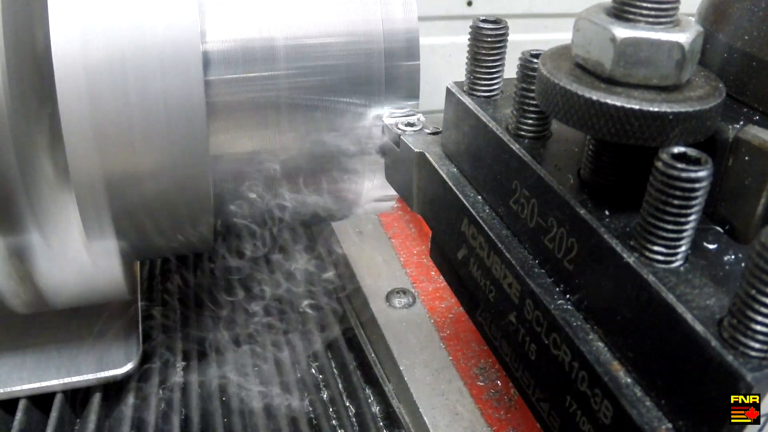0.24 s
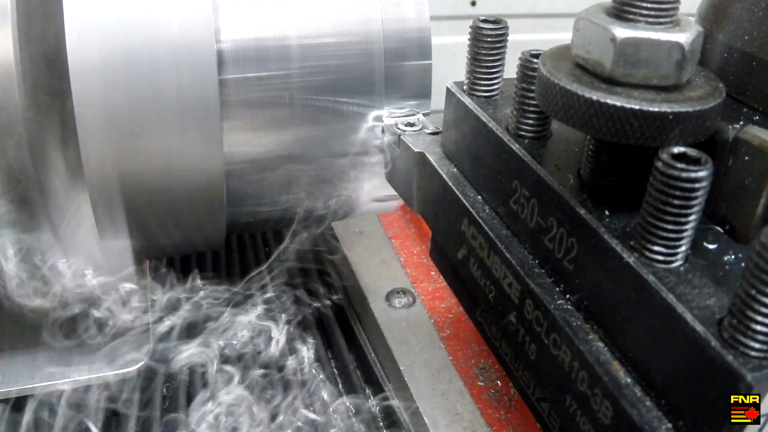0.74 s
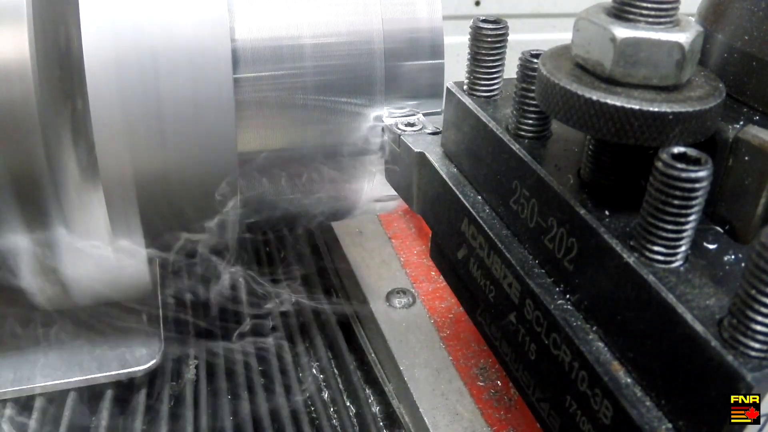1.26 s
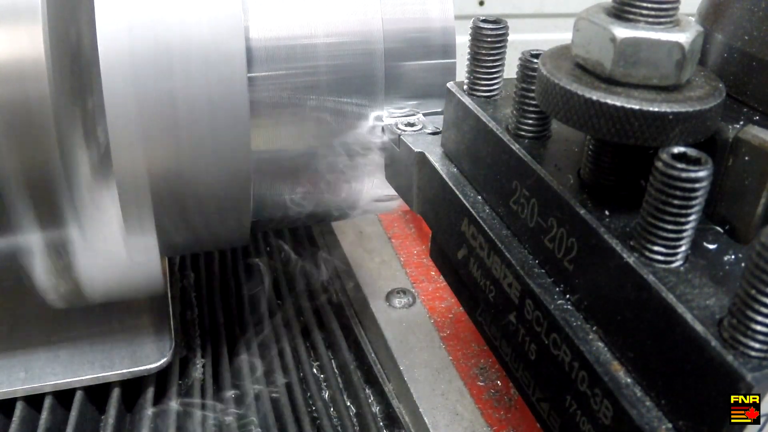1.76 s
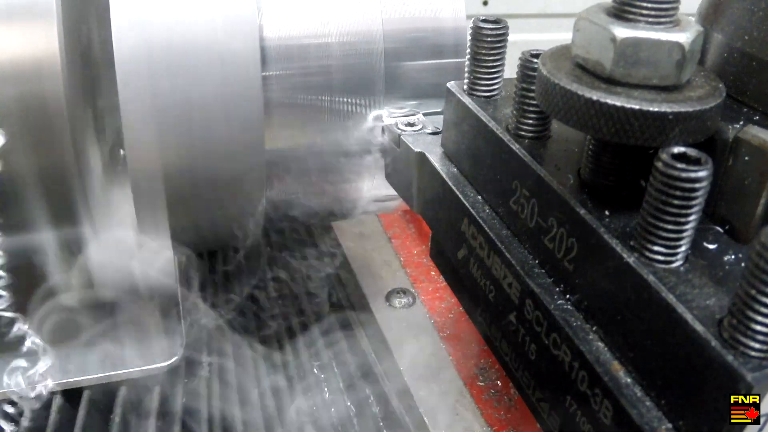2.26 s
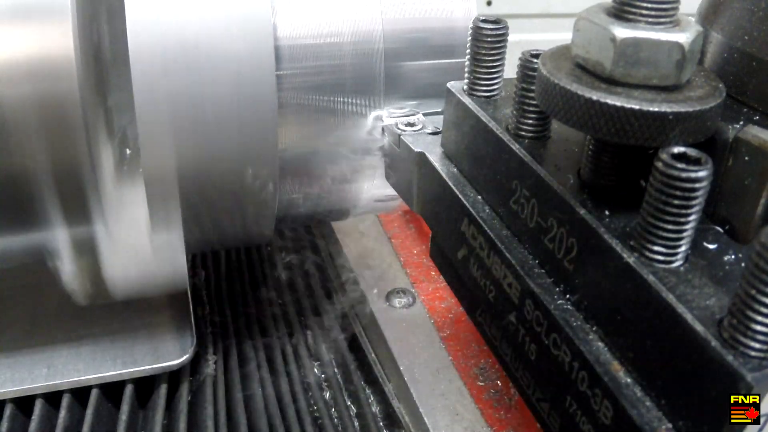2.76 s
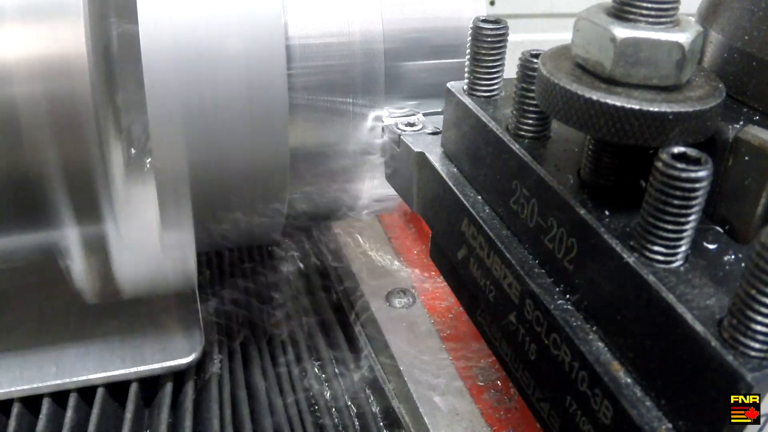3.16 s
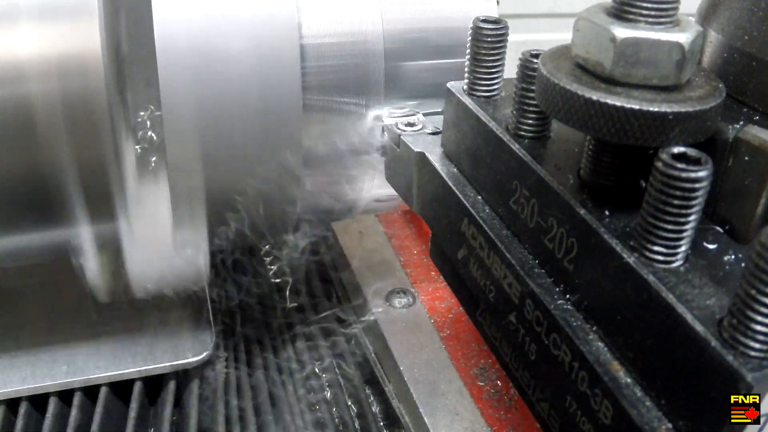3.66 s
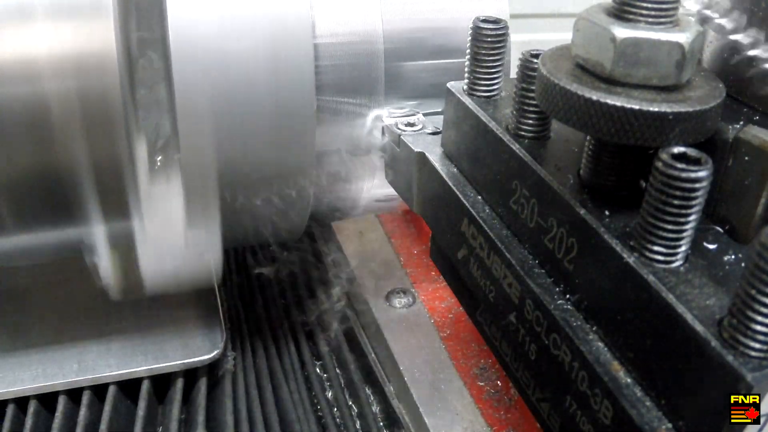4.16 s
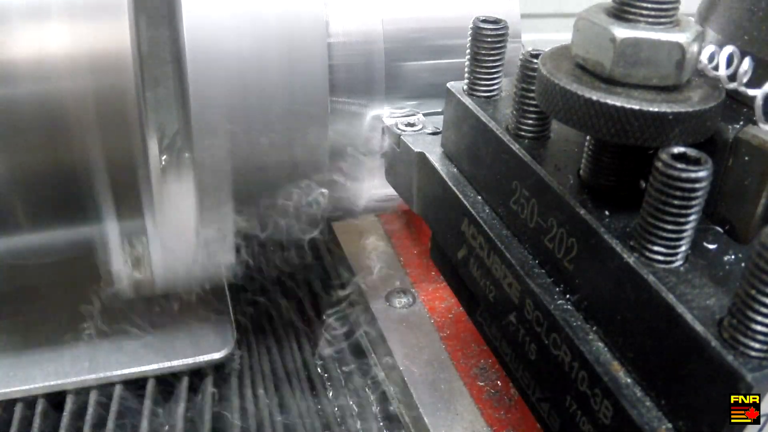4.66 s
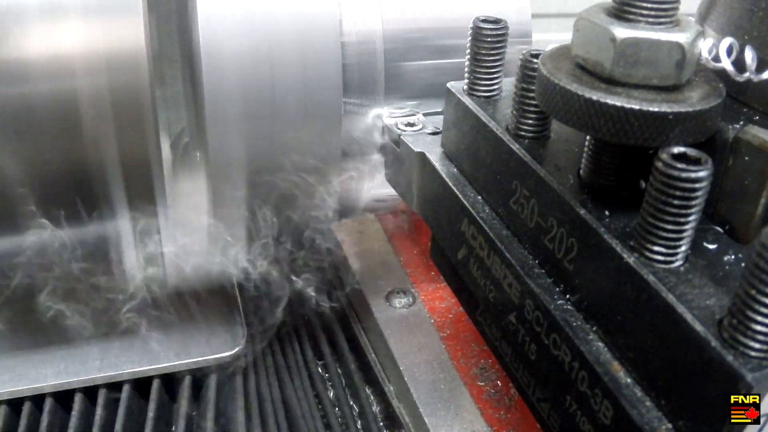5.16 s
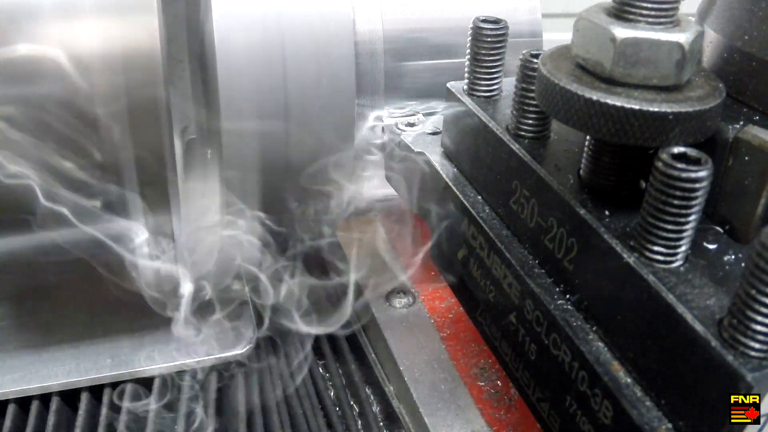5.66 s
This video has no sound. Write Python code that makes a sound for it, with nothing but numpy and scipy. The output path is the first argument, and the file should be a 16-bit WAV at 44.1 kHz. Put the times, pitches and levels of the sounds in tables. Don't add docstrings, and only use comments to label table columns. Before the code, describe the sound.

A lathe drones and hums while its tool scrapes and hisses on spinning metal, with curled chips snapping sharply against the housing.

```python
import sys
import numpy as np
from scipy import signal
from scipy.fft import rfft, irfft
from scipy.io import wavfile
from scipy.ndimage import uniform_filter1d

SR = 44100
rng = np.random.default_rng(int(sys.argv[2]) if len(sys.argv) > 2 else 0)


def gain_from_decibels(decibels):
    exponent = np.asarray(decibels, float) / 20
    return 10 ** exponent


def persist_wave(psi):
    counts = np.round(np.clip(psi, -1, 1) * 32767).astype(np.int16)
    wavfile.write(sys.argv[1], SR, np.atleast_2d(counts).T)


N = 261072


def evened(x):
    return x / np.sqrt(np.mean(x ** 2) + 1e-20)


def add(mix, s, sound):
    part = mix[round(s * SR):][:len(sound)]
    part += sound[:len(part)]


def drift(hz):
    f = np.fft.rfftfreq(N, 1 / SR)
    return evened(irfft(rfft(rng.standard_normal(N)) / np.sqrt(1 + (f / hz) ** 4), N))


def band(x, lo_hz, hi_hz):
    sos = signal.butter(4, [lo_hz, hi_hz], "band", fs=SR, output="sos")
    return evened(signal.sosfilt(sos, x))


def shaken(force, modes, skirt):
    f = np.fft.rfftfreq(N, 1 / SR)
    power = 0
    for hz, width, db in modes:
        power = power + gain_from_decibels(db) ** 2 / (1 + (2 * (f - hz) / width) ** 2) ** skirt
    return evened(irfft(rfft(force) * np.sqrt(power), N))


# (t/s, level over rest/dB, fade/s)
BITES = [(0.024, 5.5, 0.057), (0.132, 8, 0.051), (0.231, 3.5, 0.081), (0.355, 8, 0.091), (0.6, 6.5, 0.051),
         (0.728, 6, .1), (0.839, 7, 0.058), (0.962, 6.5, 0.059), (1.108, 4.5, 0.11), (1.245, 2.5, 0.095),
         (1.33, 1.5, 0.097), (1.71, 4.5, .07), (1.839, 5.5, 0.15), (2.108, 9, 0.07), (2.292, 5, 0.12),
         (2.466, 5.5, 0.091), (2.6, 9, 0.022), (2.713, 0, 0.12), (2.925, 6, 0.018), (3.067, 4, 0.12),
         (3.2, 2, .2), (3.467, 5.5, 0.12), (3.69, 5, 0.32), (4.113, 2, 0.84), (4.513, 1, 0.05),
         (4.802, 2.5, 0.21), (5.162, 4, 0.077), (5.292, 4, 0.074), (5.41, 3.5, 0.17), (5.741, 6, 0.094)]


def bite_db(t):
    rest_db, catch_s = -10, 0.0013
    force_db = rest_db
    for s, db, fade in BITES:
        since = np.maximum(t - s, 0)
        force_db = force_db + db * (1 - np.exp(-since / catch_s)) * np.exp(-(since / fade) ** 2)
    return force_db


def cutting_force(turn_db, gust_db, grit_db):
    spindle_hz = 8.8
    turns = np.cumsum(spindle_hz * (1 + 0.045 * drift(2.0))) / SR
    swell_db = turn_db * np.cos(2 * np.pi * turns)
    return rng.standard_normal(N) * gain_from_decibels(swell_db + gust_db * drift(40) + grit_db * drift(310))


# (f/Hz, width/Hz, level/dB)
TOOL_MODES = [(3462, 135, -4), (3730, 170, -12.5), (3887, 134, -8), (4360, 72, -23), (4414, 198, 1),
              (4660, 100, -9), (4840, 205, -2.5), (4994, 180, -6), (5400, 200, -14), (6170, 170, -16),
              (6570, 198, -9.5), (6900, 150, -68.5)]


def tool_scrape(force, force_db):
    scrape = 0
    for k, group_db in enumerate([-5, 0, -12]):
        chatter = gain_from_decibels(1.03 * drift(35.0)) * force
        group = TOOL_MODES[4 * k:4 * k + 4]
        scrape = scrape + gain_from_decibels(group_db) * shaken(chatter, group, skirt=1.68)
    return gain_from_decibels(0.5 + force_db) * evened(scrape)


# (f/Hz, width/Hz, level/dB)
POST_MODES = [(717, 57, -11.5), (764.2, 52.5, -0.5), (937, 39.5, 0), (986.6, 63, 0), (1184, 180, -19),
              (1209, 23, -6.5), (1454, 200, -10), (1550, 77, -1), (1634, 67, -5), (1708, 39, -5),
              (2020, 99, -22), (2090, 92, -9), (2300, 98, -4.5), (2280, 150, -8), (2770, 220, -30),
              (3054, 240, -27)]


def post_ring(force, force_db):
    return gain_from_decibels(1 + 0.45 * force_db) * shaken(force, POST_MODES, skirt=1.48)


# (f/Hz, level per Hz/dB)
HISS = [(5000, -56), (6900, -10), (7300, -25), (8100, 15), (8550, -7), (8900, 17.5), (9600, -16),
        (10200, 14.5), (10700, -3), (12000, -34), (13400, -24), (14200, -7), (15400, -18)]


def cut_hiss(force, force_db):
    f = np.fft.rfftfreq(N, 1 / SR)
    hz, db = np.transpose(HISS)
    colour = gain_from_decibels(np.interp(np.log(f + 1), np.log(hz), db))
    gusty = force * gain_from_decibels(0.86 * drift(24.0))
    return gain_from_decibels(-35 + force_db) * evened(irfft(rfft(gusty) * colour, N))


def contact(length, t60):
    t = np.arange(1500) / SR
    rise_s = 0.0003
    held = gain_from_decibels(-7 * np.minimum(t / length, 1) - 60 * np.maximum(t - length, 0) / t60)
    return t, held * (1 - np.exp(-(t / rise_s) ** 2))


def rung(t, hz, rough, noise):
    settle = 0.0012
    bend = 0.09 * settle * (1 - np.exp(-t / settle))
    return np.sin(2 * np.pi * hz * (t + bend)) + rough * band(noise, 0.82 * hz, 1.09 * hz)


# (t/s, peak level/dB, ring f/Hz, second ring f/Hz, contact/s)
KNOCKS = [(1.4218, -11, 2060, 4980, 0.0047), (1.4257, -23, 2300, 980, 0.014),
          (1.454, -12, 1900, 6570, 0.003), (1.469, -10, 1780, 3800, 0.002),
          (1.4907, -16.5, 970, 4960, .012), (1.568, -16.5, 2120, 1170, .0046),
          (1.958, 0.7, 2166, 3590, 0.0014), (1.958, -10, 2770, 1400, .0017),
          (2.365, -22, 3680, 1620, .0023), (2.3965, -14.5, 1860, 5030, .0025),
          (2.3988, -17.5, 2790, 3760, 0.0051), (2.429, -16.5, 2320, 1740, 0.0085),
          (2.7262, -11.5, 1400, 2150, 0.0035), (2.879, -12.5, 1000, 1790, .006),
          (3.385, -13.5, 1980, 6360, .0025), (3.395, -12.5, 1820, 5260, .0036),
          (3.402, -11.5, 2870, 2050, 0.0045), (3.4147, -16, 2100, 6460, .0025),
          (3.8542, -6.5, 2090, 3270, 0.0025), (3.852, -8, 1480, 4760, 0.0019),
          (4.444, -18.5, 2210, 4760, .009), (4.4583, -13, 1880, 6370, 0.002),
          (4.573, -11, 3710, 1720, 0.0028), (4.947, -17, 2000, 1500, .0064)]


def knock(db, ring_hz, second_hz, length):
    t, shape = contact(length, 0.017)
    noise = rng.standard_normal(len(t))
    rough = min(0.002 / length, 0.7)
    second_db = -3 - 5 * abs(np.log2(second_hz / ring_hz))
    rings = rung(t, ring_hz, rough, noise) + gain_from_decibels(second_db) * rung(t, second_hz, rough, noise)
    thud = gain_from_decibels(-10) * band(noise, 900, 2600)
    return gain_from_decibels(db) * shape * (rings + thud)


# (t/s, peak level/dB, contact/s)
CRACKS = [(1.4215, -18.5, .003), (1.569, -24, 0.0034), (1.455, -15, 0.0037), (1.469, -14, .002),
          (1.958, -14.5, 0.0033), (2.363, -15.5, 0.0032), (2.3962, -14.5, 0.0049), (2.727, -24, 0.004),
          (3.3857, -31, .003), (3.3954, -15, 0.0043), (3.3978, -21, .004), (3.415, -19, 0.0044),
          (2.8788, -18, 0.0044), (4.947, -23.5, 0.0037), (3.8536, -10, 0.0025), (4.4588, -17, 0.0031),
          (4.57, -20, 0.0031)]


def crack(db, length):
    t, shape = contact(length, 0.0023)
    slips = rng.standard_normal(len(t)) * rng.exponential(1, len(t))
    return gain_from_decibels(db) * shape * band(slips, 990, 5900)


# (t/s, peak level/dB, f/Hz, fizz level over the ring/dB, contact/s)
TINKS = [(1.422, -26, 7760, -3, 0.0041), (1.454, -17.5, 8460, -6, 0.0026), (1.4693, -24, 8160, 1, 0.0023),
         (1.491, -42, 11700, -8, .002), (1.496, -42, 11700, -8, .002), (1.568, -54, 7650, -3, .003),
         (1.958, -23, 8860, -3, 0.0021), (1.958, -12.5, 6380, -5, 0.0022), (2.364, -18, 7800, -6, 0.003),
         (2.3962, -20, 8100, -11, 0.0055), (2.4275, -42, 10300, 2, 0.0036), (2.726, -50, 11900, -1, 0.0023),
         (2.8783, -26.5, 11900, -4, 0.0016), (3.3852, -33, 9700, -8, 0.0031),
         (3.396, -22.5, 8690, -2, 0.0029), (3.402, -23, 9380, -3, 0.0025), (3.4146, -36, 8030, -1, 0.0045),
         (3.853, -23, 9600, 1, 0.0048), (4.4358, -41, 8240, -13, .007), (4.4586, -14, 9430, -19, 0.002),
         (4.572, -19, 8250, -1.5, 0.0029), (4.574, -18.5, 6570, -18, 0.0023), (4.947, -42, 8400, 1, 0.0033)]


def tink(db, hz, fizz_db, length):
    t, shape = contact(length, 0.009)
    noise = rng.standard_normal(len(t))
    ring = np.sin(2 * np.pi * hz * t) + 0.28 * band(noise, 0.93 * hz, 1.11 * hz)
    fizz = band(noise, 3500, 11100) + 0.16 * band(noise, 11000, 16300)
    return gain_from_decibels(db) * shape * (ring + gain_from_decibels(fizz_db - 2.0) * fizz)


# (t/s, peak level/dB, f/Hz, length/s)
RUSTLES = [(0.304, -44, 9070, 0.025), (0.35, -33, 8150, 0.016), (0.455, -39, 8080, 0.025),
           (0.545, -37, 8100, 0.042), (1.244, -32, 8700, 0.034), (1.3219, -35, 8210, 0.025),
           (1.3753, -34, 7820, 0.015), (1.78, -39, 8300, 0.025), (2.105, -45.5, 9050, 0.023),
           (2.2962, -50, 7750, 0.025), (2.645, -38, 8300, 0.05), (2.6848, -35, 8310, 0.038),
           (3.2001, -37, 7880, 0.025), (3.2251, -34, 8230, 0.025), (3.4845, -61, 9180, 0.025),
           (4.05, -39, 7850, 0.025), (4.0971, -46, 8200, 0.023), (4.5191, -39, 8280, 0.023),
           (4.8838, -55, 8040, 0.025), (5.083, -39, 7800, 0.025), (5.2011, -42, 7910, 0.025),
           (5.414, -38, 8160, 0.025), (5.673, -46, 10200, 0.025), (5.702, -46, 7850, 0.025),
           (5.875, -49, 7800, 0.025)]


def rustle(db, hz, length):
    t = np.arange(3000) / SR
    noise = rng.standard_normal(len(t))
    u = t / length
    puff = np.sqrt(u) * np.exp(-2.2 * u ** 2)
    grit = 0.43 * band(noise, 8200, 11000) + 0.13 * band(noise, 10300, 14700)
    return gain_from_decibels(db - 9.5) * puff * (band(noise, 0.944 * hz, 1.08 * hz) + grit)


# (f/Hz, width/Hz, level/dB)
BED_MODES = [(75, 4.7, -8.5), (110.8, 33, -7.5), (162.7, 23.8, 2.5), (203.5, 38, -5.5), (301, 63, -10),
             (368, 45, -4.5), (389, 27.5, -6), (485, 40, -20.5), (517.6, 43, -16)]


def drive_rumble():
    bed = shaken(rng.standard_normal(N), BED_MODES, skirt=1.87)
    deep = shaken(rng.standard_normal(N), [(35, 55, 0)], skirt=3.4)
    return bed + gain_from_decibels(-25) * deep


# (f/Hz, level/dB)
HUM = [(119.9, -10), (240.2, -9), (600, -33.5), (1273, -27)]


def motor_hum():
    t = np.arange(N) / SR
    hum = 0
    for hz, db in HUM:
        level = np.sqrt(2) * gain_from_decibels(db + 1.63 * drift(1.15))
        hum = hum + level * np.sin(2 * np.pi * hz * t + 0.52 * drift(1.26))
    return hum


# (t/s, level over the machine/dB)
SHAFT = [(0.0, -10), (0.25, -28.5), (0.5, -15), (1.2, -19), (1.7, -30), (2.1, -10), (3.0, -19), (3.4, -20),
         (4.45, -27), (4.65, -12), (5.0, -28), (5.92, -22)]


def shaft(t):
    shaft_hz, wobble_hz, wobble_low_s = 32, 4.0, 2.43
    throb = 1 - 0.3 * np.cos(2 * np.pi * wobble_hz * (t - wobble_low_s))
    return gain_from_decibels(np.interp(t, *np.transpose(SHAFT))) * throb * np.sin(2 * np.pi * shaft_hz * t)


def machine(force_db):
    force = cutting_force(turn_db=-0.5, gust_db=1.59, grit_db=1.5)
    cut = tool_scrape(force, force_db) + post_ring(force, force_db) + cut_hiss(force, force_db)
    return cut + drive_rumble() + motor_hum()


# (f/Hz, width/Hz, depth 0-1)
DIPS = [(52, 10, .8), (140, 12, .8), (445, 30, .7), (1255, 20, .6), (1360, 25, .6), (1790, 50, .8),
        (2500, 60, .75), (3600, 60, .7), (5200, 50, .7), (5800, 70, .6), (6230, 80, .8), (7130, 150, .5),
        (7400, 400, .45), (13300, 600, .35)]


def through_frame(x):
    f = np.fft.rfftfreq(N, 1 / SR)
    gain = 1 / (1 + (f / 15000) ** 120)
    for hz, width, depth in DIPS:
        gain = gain * (1 - depth / (1 + (2 * (f - hz) / width) ** 2))
    return irfft(rfft(x) * gain, N)


# (t/s, lasting drop level/dB, brief extra drop level/dB)
DUCKS = [(0.0, 7, -0.5), (1.424, 4.5, 3.5), (1.47, 3, 1.5), (1.57, 3, -2.5), (1.961, 4.5, 5.5),
         (2.4, 2.5, -3.5), (2.43, 1.5, -0.5), (2.73, -1.5, -2.5), (2.88, 1.5, -0.5), (3.415, 4.5, -0.5),
         (3.854, 3, 3), (4.458, 1, 5), (4.574, 3, 0)]


def gain_db(t):
    open_db, slow_s, quick_s = -18.5, 0.96, 0.1
    drop = 0
    for s, slow_db, quick_db in DUCKS:
        since = np.maximum(t - s, 0)
        recovery = slow_db * np.exp(-since / slow_s) + quick_db * np.exp(-since / quick_s)
        drop = drop + (t >= s) * recovery
    return open_db - uniform_filter1d(drop, size=4)


def scene():
    t = np.arange(N) / SR
    coarse = t[::32]
    gain = gain_from_decibels(np.interp(t, coarse, gain_db(coarse)))
    force_db = np.interp(t, coarse, bite_db(coarse))
    mix = through_frame(gain * machine(force_db)) + gain_from_decibels(3.5) * gain * shaft(t)
    for source, events in (knock, KNOCKS), (crack, CRACKS), (tink, TINKS), (rustle, RUSTLES):
        for s, *row in events:
            add(mix, s, source(*row))
    return mix[None]


def top_cut(x):
    return signal.sosfilt(signal.butter(12, 15700, fs=SR, output="sos"), x)


def record(dry):
    knee, ceiling = 0.4, 0.68
    room = ceiling - knee
    over = np.maximum(abs(dry) - knee, 0)
    limited = dry - np.sign(dry) * (over - room * np.tanh(over / room))
    edge = signal.firwin(95, 15400, window=("kaiser", 8), fs=SR)
    mix = signal.oaconvolve(limited, edge[None], "same")
    return top_cut(mix)


dry = scene()
out = record(dry)
persist_wave(out)
```